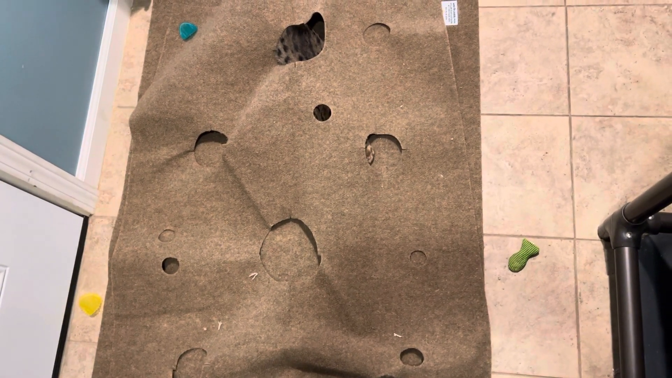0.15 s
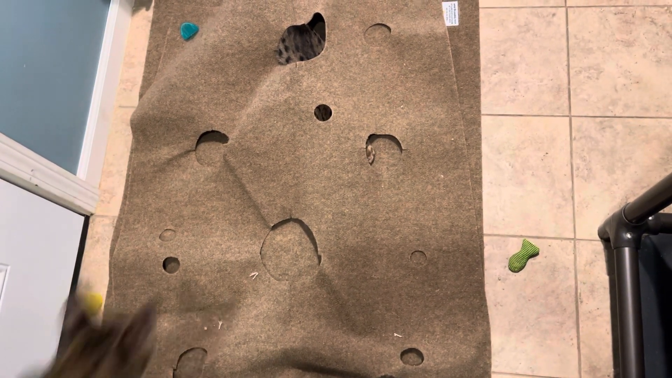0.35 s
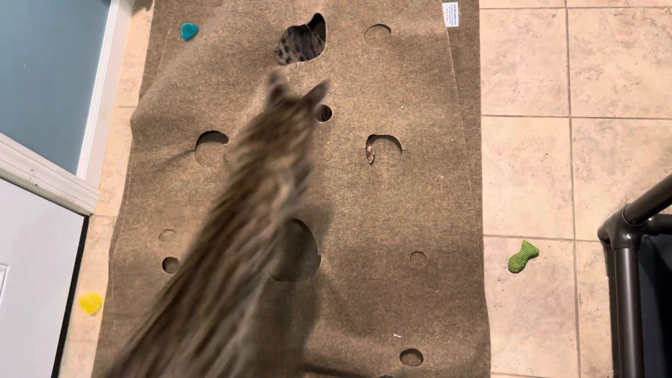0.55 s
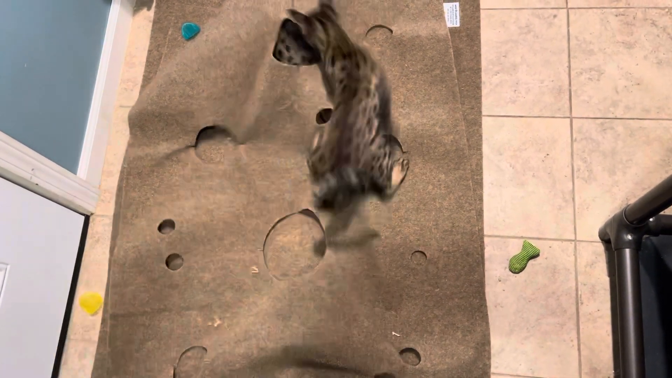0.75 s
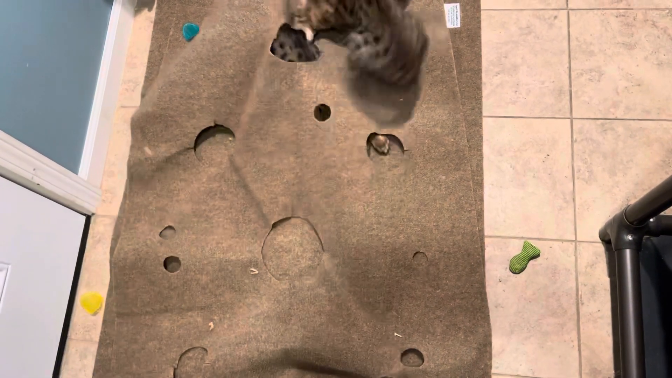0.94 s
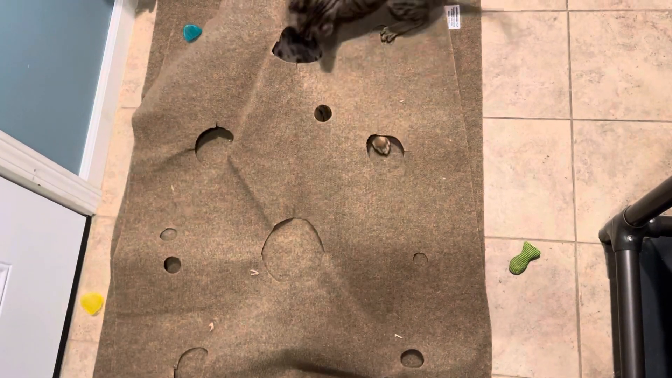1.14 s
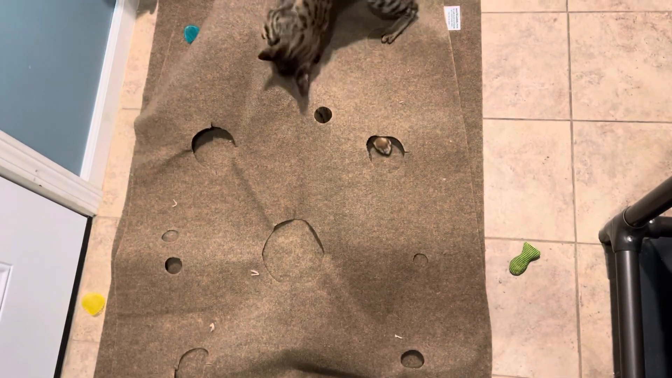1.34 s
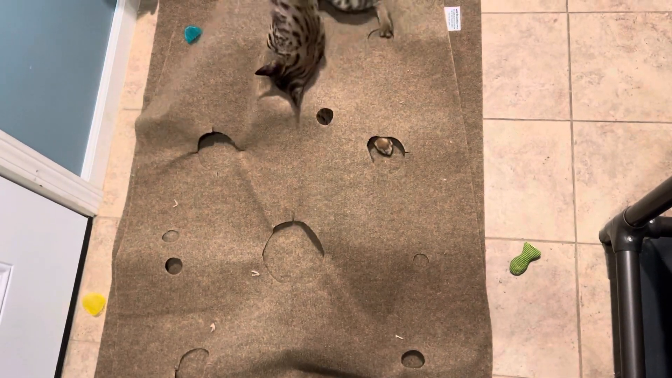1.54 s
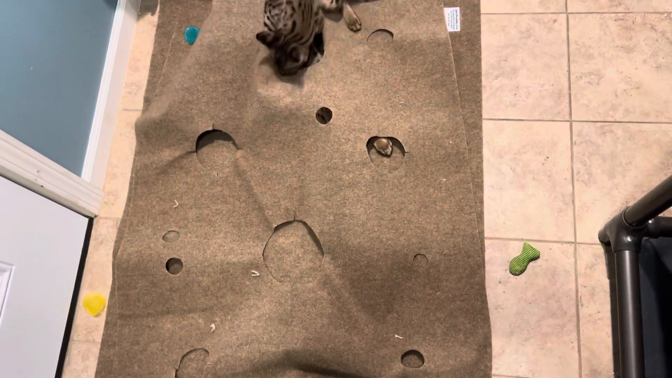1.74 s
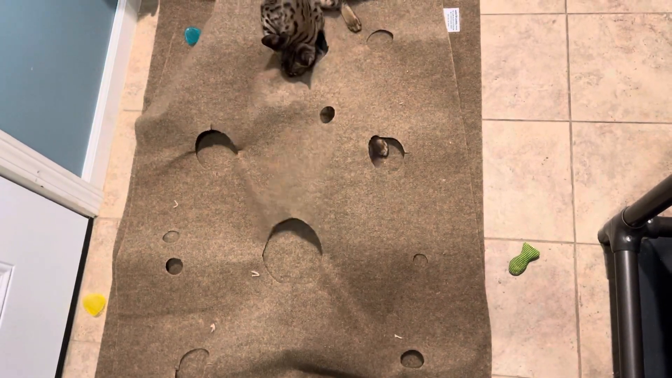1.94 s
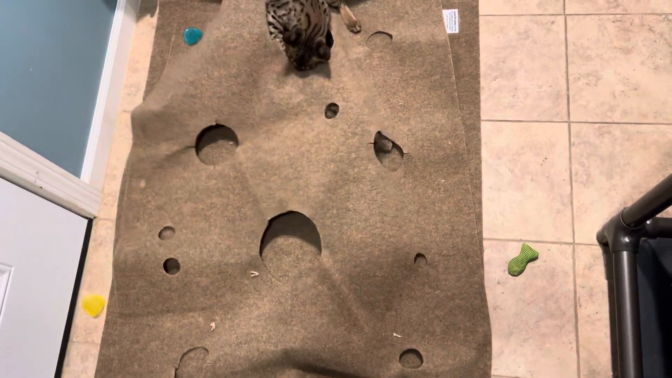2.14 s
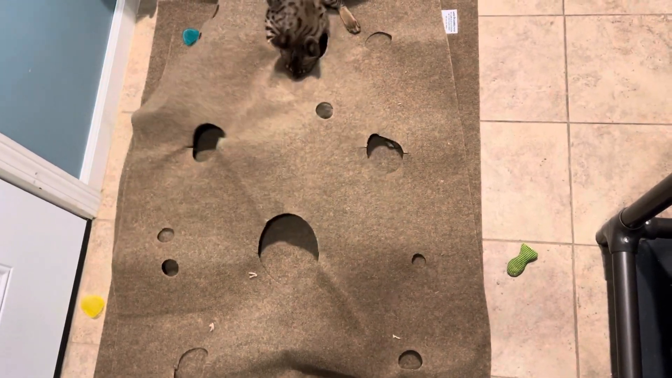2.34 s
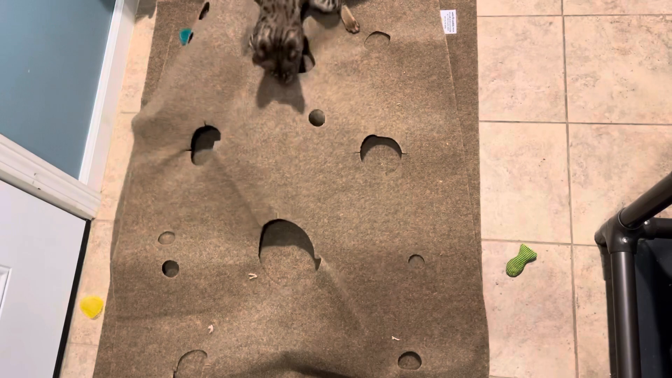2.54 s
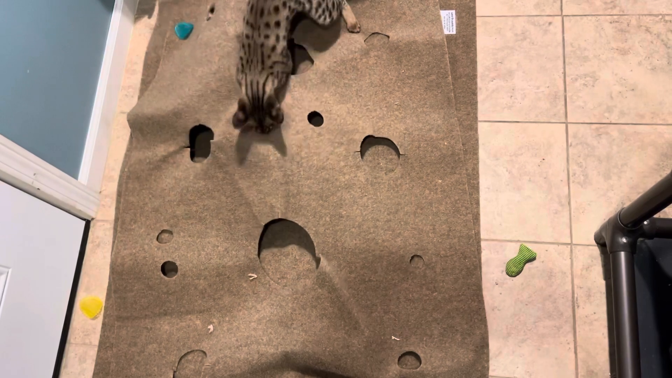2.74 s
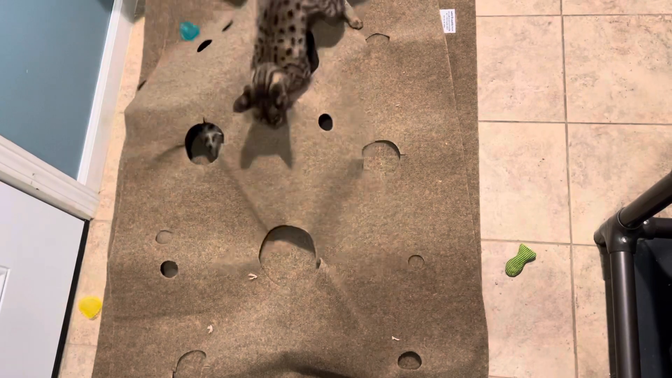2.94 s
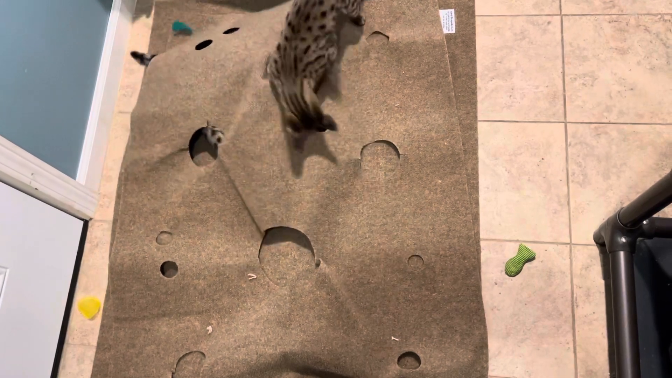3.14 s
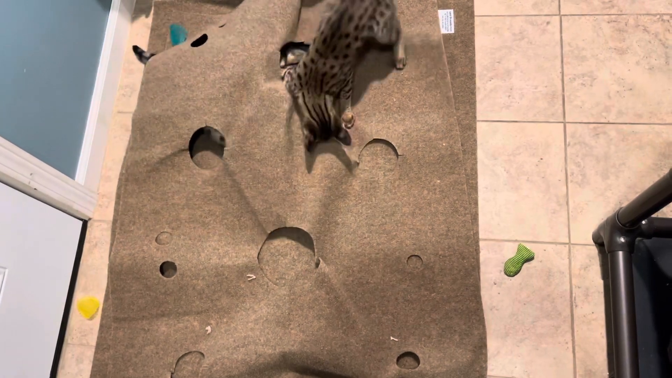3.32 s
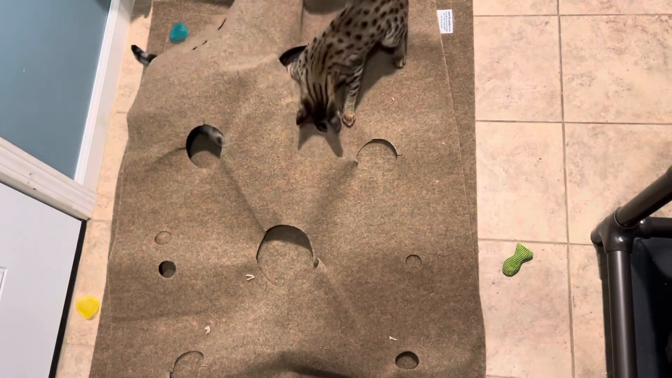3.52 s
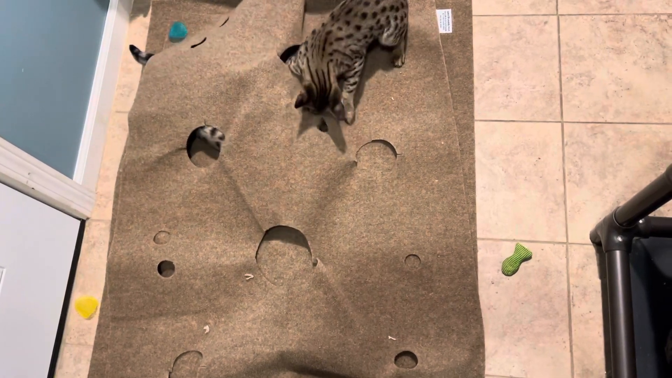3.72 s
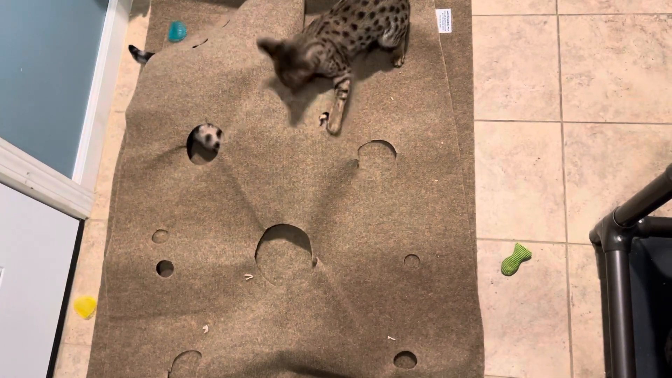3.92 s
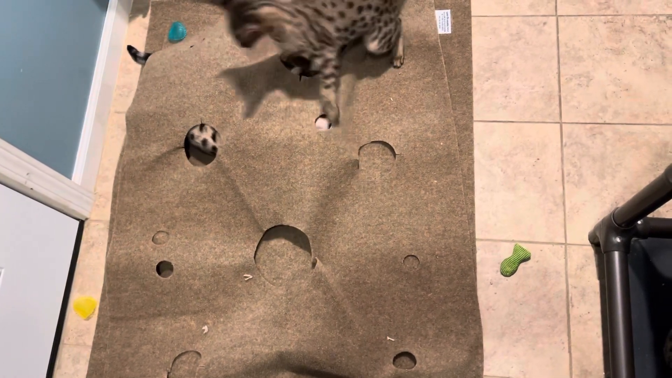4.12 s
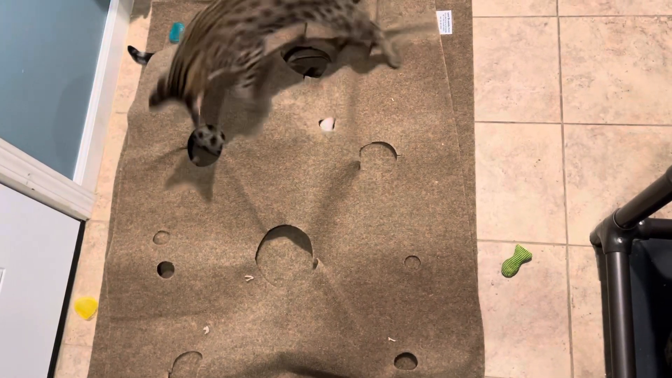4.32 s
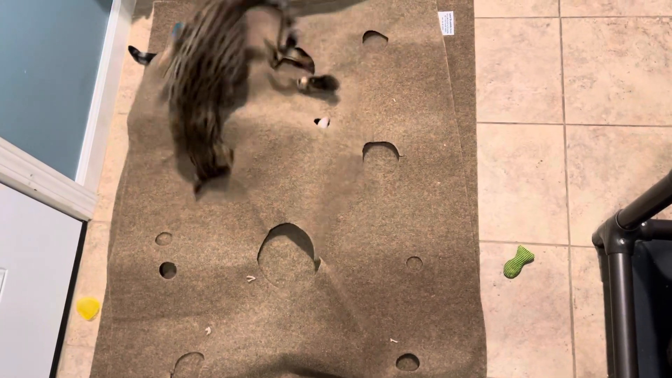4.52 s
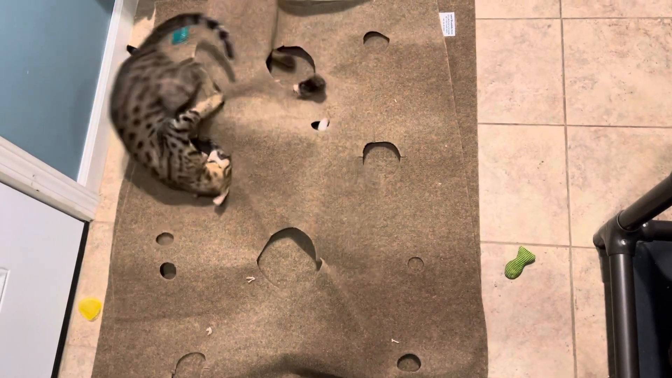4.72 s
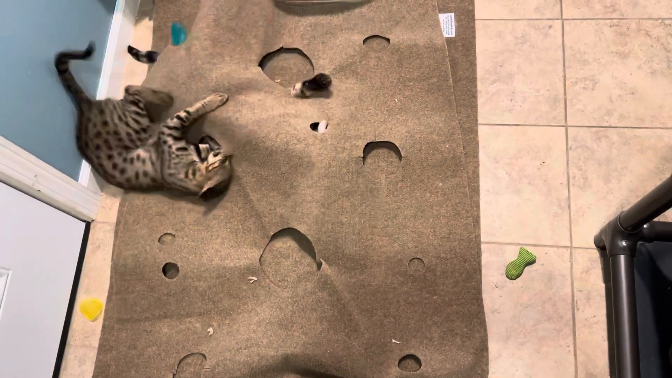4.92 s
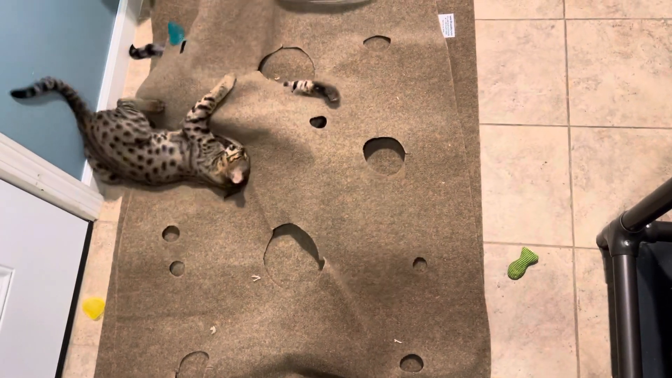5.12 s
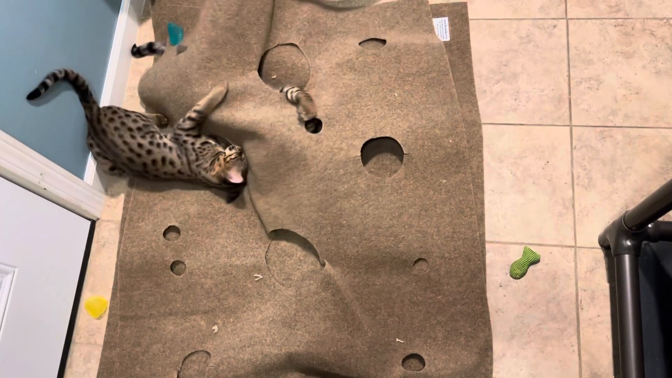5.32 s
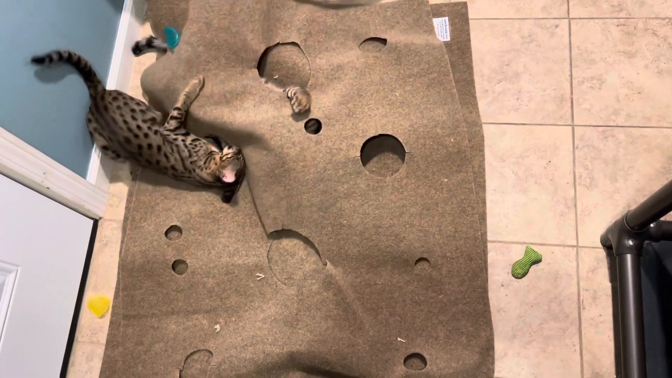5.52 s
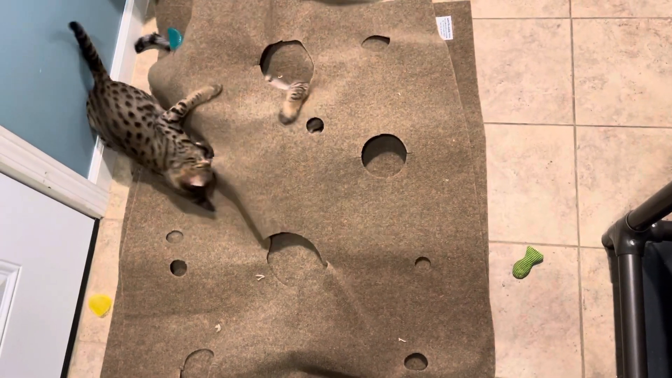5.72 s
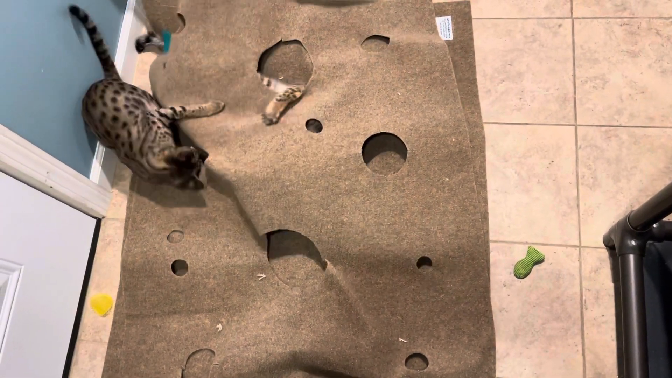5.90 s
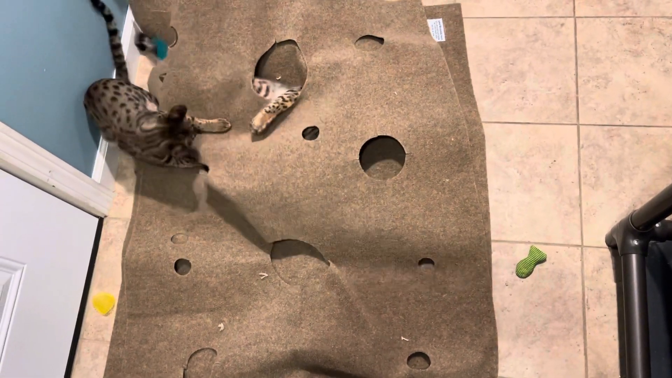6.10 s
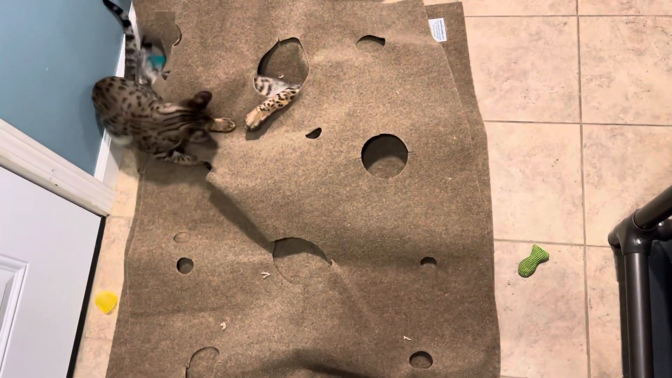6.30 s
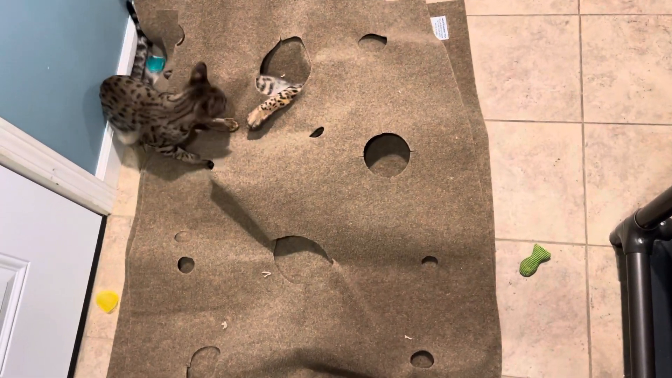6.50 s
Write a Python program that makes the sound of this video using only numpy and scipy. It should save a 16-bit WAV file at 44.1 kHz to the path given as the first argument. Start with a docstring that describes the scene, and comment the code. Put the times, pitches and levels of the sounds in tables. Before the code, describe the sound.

Close stereo sound in a small tiled room with a faint, steady low rumble. The first half second is nearly quiet, with a slight rasp starting. At about 0.66-0.9 s a kitten pounces: dense, hard slaps of rug against tile, thumps and skidding scuffs, with short reverberation; more slaps and shoves follow around 1.0 s. From 1.2 to 2.2 s it is much quieter, with light rustle and small claw ticks. From 2.25 to 2.9 s digging grows, with dull scuffs, pops, rasps and a low flap of air. A very loud, bright tearing crack hits at 3.0 s. Sparse plucks and hollow fold pops continue to 4.4 s. A rasping, hissy shove and thud come at 4.5 s, then the heaviest body thumps at 4.86-5.04 s. Rustling eases; a last scuff, thump and claw snaps at 5.9 s fade into quiet by 6.6 s.

```python
"""Kittens on a felt play rug

Small tiled room, close pair of microphones above a stiff felt rug on which kittens pounce, dig and roll.
Grains of noise make the rustle and scuffs, uneven ticks the rasps, clicks with a noisy crush the slaps,
plucks, pops and tears. Cushioned noise bursts make bodies thump on the floor, and a wavering low tone
makes the rug flap air. Dense decaying echoes answer from the walls, over a steady low rumble of noise."""
import sys
import numpy as np
from scipy import signal
from scipy.fft import rfft, irfft, next_fast_len
from scipy.io import wavfile
from scipy.ndimage import uniform_filter1d

SR = 44100
rng = np.random.default_rng(int(sys.argv[2]) if len(sys.argv) > 2 else 0)


def generate_wav(signal):
    """Clip the signal to [-1, 1] and save it as 16-bit WAV at the path in sys.argv[1]."""
    frames = np.transpose(np.atleast_2d(signal))
    scaled = np.clip(frames, -1, 1) * 32767
    pcm = np.round(scaled).astype(np.int16)
    wavfile.write(sys.argv[1], SR, pcm)


N = 293529
TIME = np.arange(N) / SR
BLOW_TIME = TIME[:SR // 4]


def from_db(db):
    """Decibels to gain."""
    return 10 ** (np.asarray(db) / 20)


def rms_one(x):
    """Scale to rms 1."""
    return x / np.sqrt(np.mean(x ** 2) + 1e-20)


def energy_one(x):
    """Scale to unit energy."""
    return x / np.sqrt(np.sum(x ** 2) + 1e-20)


def in_time(rows):
    """One sample-rate curve for each column of a table after its time column."""
    s, *columns = np.transpose(rows)
    return [np.interp(TIME, s, column) for column in columns]


def at_hz(points, hz):
    """Read a table on a log-frequency axis."""
    known_hz, values = np.transpose(points)
    return np.interp(np.log(hz + 1e-9), np.log(known_hz), values)


def add(track, s, sound):
    """Mix a sound into a track from time s."""
    start = max(round(s * SR), 0)
    track[start:start + len(sound)] += sound[:N - start]


def drift(rate):
    """Smooth chance with spread 1, turning about rate times a second."""
    knots = rng.standard_normal(N // 40)
    return rms_one(np.interp(TIME * rate, np.arange(len(knots)), knots))


def octave_band(x, centre_hz, octaves):
    """Keep a band of the given width around a centre frequency."""
    edges_hz = centre_hz * 2 ** (np.array([-.5, .5]) * octaves)
    return signal.sosfilt(signal.butter(2, edges_hz, "band", fs=SR, output="sos"), x)


def coloured(x, colour, size=8192):
    """Causal (minimum-phase) filter of unit energy with the given spectrum."""
    cepstrum = irfft(np.log(from_db(at_hz(colour, np.fft.rfftfreq(size, 1 / SR)))))
    # fold the cepstrum onto positive times, so nothing sounds before its cause
    cepstrum[1:size // 2] *= 2
    cepstrum[size // 2 + 1:] = 0
    response = energy_one(irfft(np.exp(rfft(cepstrum))))
    return signal.fftconvolve(x, response)[:len(x)]


def evened(x, width_hz):
    """Level out chance peaks and dips of the spectrum, leaving the course in time; unit energy."""
    hz = np.fft.rfftfreq(len(x), 1 / SR)
    power = uniform_filter1d(np.abs(rfft(x)) ** 2, max(round(width_hz / hz[1]), 1))
    inverse_db = -10 * np.log10(power + 1e-12)
    return energy_one(coloured(x, np.column_stack([hz, inverse_db])[1:]))


def contact(die_s, crush):
    """A short click with a noisy crush that dies over a few milliseconds; unit energy."""
    tail = energy_one(rng.standard_normal(len(BLOW_TIME)) * np.exp(-BLOW_TIME / max(die_s, 1e-4)))
    click = signal.unit_impulse(len(BLOW_TIME))
    # bending waves in the backing run at unequal speeds, which spreads the click without colouring it
    for hz in rng.uniform([700, 1500, 3500, 7000], [1500, 3500, 7000, 11000]):
        poles = signal.iirpeak(hz, 2, fs=SR)[1]
        click = signal.lfilter(poles[::-1], poles, click)
    return evened(click + crush * tail, width_hz=190)


def grains(per_s, spread_db):
    """Tiny slips of fibres at random moments, of very uneven size; rms 1."""
    sizes = from_db(spread_db * np.minimum(rng.exponential(1, N), 4)) * rng.choice([-1, 1], N)
    return rms_one(sizes * (rng.random(N) < per_s / SR))


# likeness of room sound at the left and right microphones: (frequency [Hz], likeness [0-1])
LIKENESS = [(100, 1), (300, 0.94), (900, 0.06), (1800, 0.88), (3200, 0.092), (4300, 0.035), (4900, 0.33),
            (5500, 0.17), (5900, 0.41), (7400, 1), (9100, 1), (11500, 0.9)]


def spread(one, other):
    """Two unrelated sounds become a pair with the left-right likeness given for each frequency."""
    size = next_fast_len(len(one))
    alike = np.clip(at_hz(LIKENESS, np.fft.rfftfreq(size, 1 / SR)), 0, 1)
    mid = rfft(one, size) * np.sqrt((1 + alike) / 2)
    side = rfft(other, size) * np.sqrt((1 - alike) / 2)
    return irfft(np.array([mid + side, mid - side]), size)[:, :len(one)]


# steady level of the room rumble [dB]
RUMBLE_DB = -45.5
# colour of the room rumble: (frequency [Hz], relative level [dB per Hz])
RUMBLE_COLOUR = [(12, -59.5), (20, -24.5), (46, -6.5), (70, 4.5), (107, -14), (136, -11), (157, -10.5),
                 (175, -17.5), (233, -13.5), (275, -19.5), (409, -29), (498, -37), (1500, -70.5),
                 (1950, -102), (3300, -120)]


def rumble():
    """The steady low rumble of the room: noise shaped towards the bass, spread over both microphones."""
    one, other = [coloured(rng.standard_normal(N), RUMBLE_COLOUR) for _ in range(2)]
    return from_db(RUMBLE_DB) * spread(one, other)


# restless shifting of the rug; the first rows give only a faint steady hiss: # (time [s], rubbing of the
# backing [dB], hiss of the fibres [dB])
RUSTLE = [(0, -80.5, -84), (0.6, -96.5, -90.5), (0.69, -50, -56), (1.1, -56.5, -55.5), (1.27, -70, -66),
          (1.45, -70, -86), (1.56, -71, -65), (1.68, -60.5, -64.5), (1.88, -65.5, -80), (2.0, -61.5, -60),
          (2.22, -54, -57.5), (2.48, -59, -56), (2.7, -52, -55.5), (3.05, -58.5, -55.5),
          (3.42, -61.5, -71.5), (3.7, -71, -63.5), (4.0, -64, -67), (4.26, -68.5, -69),
          (4.42, -57.5, -52.5), (4.78, -63, -61), (4.95, -49.5, -52), (5.2, -60.5, -62.5), (5.6, -62, -62),
          (6.0, -57, -58), (6.24, -71, -76), (6.4, -65, -79), (6.5, -85.5, -90.5), (6.6, -86, -85.5)]
# shoves sliding the rug over the tiles: (middle [s], length [s], rubbing [dB], hiss of the fibres [dB])
SHOVES = [(0.716, 0.053, -43, -51.5), (1.002, 0.055, -42.5, -50), (1.039, 0.061, -44, -43),
          (1.389, 0.13, -59, -60), (3.26, 0.069, -54.5, -66.5), (3.542, 0.069, -82, -57.5),
          (4.078, 0.049, -64, -59.5), (4.563, 0.064, -49, -38.5), (4.872, 0.059, -67, -49.5),
          (5.261, 0.066, -61, -60.5), (5.922, 0.12, -50.5, -53), (6.611, 0.026, -83, -74.5)]


def rub_and_hiss():
    """Gains of backing and fibres: restless shifting, plus a bell-shaped swell for each shove."""
    power = from_db(in_time(RUSTLE)) ** 2
    for s, length_s, rub_db, fibre_db in SHOVES:
        swell = np.exp(-np.pi * ((TIME - s) / length_s) ** 2)
        power = power + np.outer(from_db([rub_db, fibre_db]) ** 2, swell)
    return np.sqrt(power)


# colour of the rubbing backing: (frequency [Hz], relative level [dB per Hz])
RUB_COLOUR = [(120, -4), (300, 6), (600, 7), (1100, 2), (2200, -5.5), (3200, -14), (5000, -9.5),
              (9000, -43.5)]
# colour of the hissing fibres: (frequency [Hz], relative level [dB per Hz])
FIBRE_COLOUR = [(1000, -11), (2400, 6), (4200, 1), (6000, 1), (7200, 0.5), (9700, 4), (10800, 1.5),
                (11800, -20.5), (13000, -38.5)]


def rustle(snags_per_s, snag_db, lumpy_db, catching_db):
    """The backing rubs in lumps while the fibres crackle finely on top, and now and then one snags."""
    rubbing, hissing = rub_and_hiss()
    catching = drift(45)
    rub = coloured(grains(per_s=1500, spread_db=2.0), RUB_COLOUR) * from_db(lumpy_db * catching)
    crackle = grains(per_s=3800, spread_db=3.0) * from_db(catching_db * catching)
    snags = from_db(snag_db) * grains(per_s=snags_per_s, spread_db=3.0)
    return rub * rubbing + coloured(crackle + snags, FIBRE_COLOUR) * hissing


# claws and rug backing dragging in short or slow rasps: (start [s], length [s], level [dB],
# first ticks [per s], last ticks [per s], unevenness of their spacing [0-1], width of the rasp [Hz])
RASPS = [(0.466, 0.037, -75.5, 1528, 1587, 0.41, 600), (0.57, 0.078, -68, 2076, 2810, 0.85, 1480),
         (1.345, 0.06, -57.5, 2293, 2125, 0.37, 457), (1.65, 0.28, -63.5, 2490, 2520, 0.57, 600),
         (2.726, 0.034, -51, 2360, 2720, 0.75, 905), (2.764, 0.055, -51, 1864, 1750, 0.6, 700),
         (4.046, 0.02, -49, 2790, 2520, 0.63, 795), (4.063, 0.04, -49.5, 2410, 2216, 0.81, 790),
         (4.475, 0.016, -50, 2390, 2760, 0.6, 900), (4.539, 0.047, -42.5, 2350, 2495, 0.74, 960),
         (5.437, 0.04, -49.5, 2427, 2543, 0.6, 820), (5.474, 0.032, -59, 2530, 2390, 0.65, 1000)]


def rasps(bite_share, fade_share, tick_spread_db):
    """Claws or backing drag in unevenly spaced ticks, whose rate sets a rough, broad pitch that glides."""
    out, t = np.zeros(N), TIME[:SR // 2]
    for s, length_s, db, first_hz, last_hz, uneven, width_hz in RASPS:
        along = np.minimum(t / length_s, 1)
        travel = np.cumsum(first_hz + (last_hz - first_hz) * along) / SR
        catches = np.cumsum(np.maximum(1 + uneven * rng.standard_normal(SR // 20), .1))
        ticks = np.diff(np.searchsorted(catches, travel), prepend=0)
        ticks = ticks * from_db(tick_spread_db * rng.standard_normal(len(t)))
        pressure = np.sqrt(np.clip(np.minimum(along / bite_share, (1 - along) / fade_share), 0, 1))
        # each tick rings briefly at the pitch of the moment; the shorter the ring, the wider the rasp
        turning = np.exp(2j * np.pi * travel)
        ring = t * np.exp(-np.pi * width_hz * t)
        ringing = signal.fftconvolve((ticks - ticks.mean()) * pressure / turning, ring)[:len(t)]
        rasp = energy_one((ringing * turning).real)
        add(out, s, from_db(db) * rasp * np.linalg.norm(pressure))
    return out


# paws bumping the rug and skidding: (time [s], level [dB], die-away [s], centre [Hz])
SCUFFS = [(0.662, -39, 0.023, 1480), (0.681, -39, 0.014, 520), (0.736, -33, 0.013, 560),
          (0.746, -37, 0.035, 2300), (0.771, -35.5, 0.008, 700), (0.865, -38, 0.025, 740),
          (0.870, -33.5, 0.027, 2780), (0.893, -44, 0.02, 1400), (1.008, -36, 0.026, 2200),
          (1.041, -38.5, 0.018, 2880), (1.402, -50, 0.0065, 1600), (1.431, -48, 0.0057, 1300),
          (1.591, -52, 0.011, 965), (1.614, -60, 0.0063, 1600), (1.987, -56, 0.028, 1390),
          (2.122, -51.5, 0.031, 1205), (2.258, -37.5, 0.02, 686), (2.388, -44.5, 0.034, 790),
          (2.516, -56, 0.021, 2180), (2.637, -41, 0.017, 530), (2.716, -51, 0.008, 448),
          (2.763, -51, 0.019, 1470), (2.811, -48, 0.049, 544), (2.945, -53, 0.012, 2700),
          (2.977, -44, 0.024, 710), (3.22, -56, 0.02, 1000), (3.261, -47, 0.016, 1300),
          (3.325, -53, 0.014, 1500), (3.728, -48.5, 0.016, 1320), (3.785, -48.5, 0.016, 1340),
          (4.06, -49, 0.035, 400), (4.478, -51, 0.018, 1890), (4.693, -43, 0.013, 2760),
          (4.835, -42.5, 0.024, 3020), (4.859, -36, 0.0063, 2200), (4.896, -40, 0.01, 2370),
          (4.933, -56, 0.02, 2480), (4.95, -50, 0.032, 647), (4.984, -48, 0.014, 2500),
          (5.099, -38, 0.0089, 1900), (5.316, -49, 0.0058, 1300), (5.964, -38.5, 0.018, 440)]


def scuffs(rise_s, octaves, slips_per_s):
    """A paw bumps the rug and skids in a dying run of slips: dull with the pad, bright with the claws."""
    out = np.zeros(N)
    for s, db, die_s, hz in SCUFFS:
        force = (1 - np.exp(-BLOW_TIME / rise_s)) * np.exp(-BLOW_TIME / die_s)
        slips = evened(force * grains(slips_per_s, spread_db=0.5)[:len(force)], width_hz=240)
        scuff = energy_one(octave_band(slips, hz, min(octaves, 3)))
        add(out, s, from_db(db) * scuff * np.linalg.norm(force))
    return out


# paws slapping the rug onto the tiles, and at 5.1 s a claw plucking with a knock: (time [s], strength [dB], #
# pitch of the trapped air [Hz], bare smack against that air [dB])
SLAPS = [(0.6624, -10.5, 1590, -2), (0.7232, -3, 680, -17.5), (0.7294, 3, 1810, 0), (0.7358, -7, 3160, 1),
         (0.742, -11, 1550, -7), (0.7505, -7.5, 630, -8.5), (0.8640, -4.5, 1430, -1.5),
         (0.983, -5, 1530, -3.5), (1.615, -28, 1860, -4), (5.0995, -20, 1610, -2)]
# colour of the bare smack: (frequency [Hz], relative level [dB per Hz])
SLAP_COLOUR = [(90, -4.5), (160, -5), (300, -7), (750, -1.5), (1100, -2.5), (1800, -2.5), (2700, -4.5),
               (4000, -3.5), (6000, -18), (10000, -12), (11500, -22.5), (13000, -55)]
# what a slap sets ringing in the arched rug: (frequency [Hz], relative level [dB], t60 [s])
RUG_MODES = [(517, -17, 0.12), (732, -8.5, 0.12), (1715, -18.5, 0.15), (1920, -21.5, 0.088)]


def slaps(die_s, pocket_q, ring_db):
    """Paws drive the rug flat on the tiles; trapped air pitches each slap, and the arched rug rings on."""
    out = np.zeros(N)
    for s, db, hz, smack_db in SLAPS:
        smack = coloured(contact(die_s, crush=1.17), SLAP_COLOUR)
        pocket = energy_one(octave_band(smack, hz, 1 / pocket_q))
        add(out, s, from_db(db) * energy_one(pocket + from_db(smack_db) * smack))
    ring = 0
    for hz, db, t60 in RUG_MODES:
        mode = np.sin(2 * np.pi * hz * BLOW_TIME) * np.exp(-np.log(1000) * BLOW_TIME / t60)
        ring = ring + from_db(db) * energy_one(mode)
    return out + from_db(ring_db) * signal.fftconvolve(out, ring)[:N]


# bodies and haunches landing: (time [s], level [dB], die-away [s], top frequency [Hz])
THUMPS = [(0.668, -32, 0.032, 670), (0.730, -29.5, 0.035, 534), (3.009, -39, 0.037, 780),
          (4.518, -30, 0.012, 307), (4.615, -41.5, 0.045, 605), (4.857, -26, 0.026, 580),
          (4.870, -24.5, 0.017, 320), (5.016, -34.5, 0.028, 540), (5.038, -30, 0.026, 262),
          (5.340, -42.5, 0.029, 393), (5.949, -39, 0.016, 610)]
# every landing builds up alike and shakes the floor with a share of its force
THUMP_RISE_S, FLOOR_HZ, FLOOR_DIE_S, FLOOR_DB = 0.0021, 91.5, 0.031, -4


def thumps(cavity_hz, cavity_q, cavity_db):
    """A soft body lands in a cushioned burst; the air under the rug booms and the floor shudders."""
    out = np.zeros(N)
    shudder = np.sin(2 * np.pi * FLOOR_HZ * BLOW_TIME) * np.exp(-BLOW_TIME / FLOOR_DIE_S)
    low_cut = signal.butter(2, 120, "high", fs=SR, output="sos")
    for s, db, die_s, top_hz in THUMPS:
        rise = np.minimum(BLOW_TIME / THUMP_RISE_S, 1)
        force = rise * np.exp(-np.maximum(BLOW_TIME - THUMP_RISE_S, 0) / die_s)
        impacts = evened(force * rng.standard_normal(len(force)), width_hz=60)
        cushion = signal.butter(3, top_hz, fs=SR, output="sos")
        thud = signal.sosfilt(np.vstack([cushion, low_cut]), impacts)
        boom = signal.lfilter(*signal.iirpeak(cavity_hz, cavity_q, fs=SR), thud)
        landing = energy_one(thud + from_db(cavity_db) * boom) * np.linalg.norm(force)
        add(out, s, from_db(db) * (landing + from_db(FLOOR_DB) * shudder))
    return out


# the whole rug heaves and pumps air: (middle [s], length [s], level [dB])
HEAVES = [(0.743, 0.06, -39), (2.8, 0.14, -41), (3.578, 0.088, -44.5), (4.43, 0.037, -45),
          (4.888, 0.042, -33), (5.105, 0.091, -39.5)]


def heaves(flap_hz, wander):
    """The lifted rug sinks back with a slow, wavering flap of air."""
    swell = 0
    for s, length_s, db in HEAVES:
        swell = swell + from_db(db) * np.exp(-np.pi / 2 * ((TIME - s) / length_s) ** 2)
    cycles = np.cumsum(flap_hz * (1 + wander * drift(40))) / SR
    return swell * rms_one(np.sin(2 * np.pi * cycles))


# sharpest plucks of a claw in the fibres: (time [s], strength [dB], dull knock against the bright snap [dB])
PLUCKS = [(1.1892, -28, 0), (1.347, -28, -8), (1.352, -21, -18), (1.616, -26, -11), (2.115, -22.5, -5),
          (2.517, -25, -1), (2.5655, -22.5, 0), (2.6673, -19.5, 2), (2.7268, -23.5, -6), (2.7506, -24, -11),
          (2.786, -25, -12.5), (2.889, -20, -2), (3.5032, -17, -8.5), (3.5517, -20, -13), (3.609, -18, -13),
          (3.914, -33, 10.5), (4.049, -37, -16), (4.4823, -19.5, 0), (4.8346, -23.5, 2),
          (4.9316, -13.5, -3.5), (4.942, -20, 3), (5.251, -32, -6), (5.317, -33, -5), (5.9681, -15, -8),
          (6.137, -36.5, -10)]
# colour of a bright snap, also the crack of a fold: (frequency [Hz], relative level [dB per Hz])
SNAP_COLOUR = [(1000, -22), (2500, 7.5), (4000, 4.5), (5700, 6.5), (7500, 5), (9800, 7.5), (11000, -3.5),
               (12300, -40.5), (14000, -39.5)]
# colour of the knocking backing: (frequency [Hz], relative level [dB per Hz])
KNOCK_COLOUR = [(100, 9), (500, -2), (1200, -6.5), (2300, 4.5), (3500, -10.5), (6000, -8.5), (13000, -35)]


def plucks():
    """A fibre lets go of a claw with a bright snap, and the backing knocks as it springs back."""
    snaps, knocks = np.zeros(N), np.zeros(N)
    for s, db, knock_db in PLUCKS:
        add(snaps, s, from_db(db) * contact(0.0051, crush=1.7))
        add(knocks, s, from_db(db + knock_db) * contact(0.01, crush=1.16))
    return coloured(snaps, SNAP_COLOUR) + coloured(knocks, KNOCK_COLOUR)


# folds of the rug popping over: (time [s], strength [dB], pitch [Hz], crack against the pop [dB])
POPS = [(2.258, -19, 985, -1.5), (2.389, -24.5, 1420, -2), (2.604, -21, 1090, -22), (2.637, -14.5, 810, -5),
        (2.765, -18, 1600, -20), (2.975, -24, 1060, -24), (3.219, -21, 920, -14), (3.261, -26.5, 920, -1.5),
        (3.414, -27.5, 1230, -21), (3.757, -22.5, 1240, 3.5), (3.872, -17.5, 1140, -11.5),
        (4.304, -20, 1020, 0.5), (4.37, -15, 1070, 1), (4.461, -14.5, 990, -20), (4.511, -22, 930, -18),
        (5.428, -25.5, 920, -0.5)]


def pops(ring_s):
    """A fold flips over with a crack, and the pocket beneath it rings briefly."""
    pockets, cracks = np.zeros(N), np.zeros(N)
    for s, db, hz, crack_db in POPS:
        ring = np.cos(2 * np.pi * hz * BLOW_TIME) * BLOW_TIME * np.exp(-BLOW_TIME / ring_s)
        pocket = energy_one(signal.fftconvolve(ring, contact(0.014, crush=0.93)))
        add(pockets, s, from_db(db) * pocket)
        add(cracks, s, from_db(db + crack_db) * contact(0.0091, crush=1.0))
    return pockets + coloured(cracks, SNAP_COLOUR)


# a hooked claw tearing loose: (time [s], strength [dB])
TEARS = [(3.0071, 4), (5.884, -30), (5.895, -19.5), (5.926, -34), (5.952, -11.5), (5.967, -18.5)]
# colour of the tearing: (frequency [Hz], relative level [dB per Hz])
TEAR_COLOUR = [(150, -8.5), (500, -4), (1300, -11), (3500, -9), (5700, 0), (7500, -1.5), (9800, 7),
               (11000, 1.5), (12300, -22), (15000, -23.5)]


def tears():
    """A deeply hooked claw breaks free with one very bright crack."""
    cracks = np.zeros(N)
    for s, db in TEARS:
        add(cracks, s, from_db(db) * contact(0.0035, crush=1.3))
    return coloured(cracks, TEAR_COLOUR)


# reverberation of the small tiled room: (frequency [Hz], t60 [s])
ROOM_T60 = [(100, 0.6), (500, 0.81), (2000, 0.39), (6000, 0.32), (12000, 0.045)]


def room_echo(build_s, count=10):
    """Response of the tiled room: dense echoes that build up, then die at a rate set band by band."""
    t, tail = TIME[:SR // 2], 0
    hz = np.fft.rfftfreq(len(t), 1 / SR)
    white = rfft(rng.standard_normal((2, len(t))))
    centres = np.geomspace(30, 15000, count)
    for centre, share in zip(centres, np.eye(count)):
        band = irfft(white * np.interp(hz, centres, share), len(t))
        tail = tail + band * 1000 ** (-t / at_hz(ROOM_T60, centre))
    build = 1 - np.exp(-t / build_s)
    return spread(*[evened(side * build, width_hz=100) for side in tail])


def room(sound, build_s, count=14):
    """The kittens keep moving, so each stretch of sound meets a different pattern of echoes."""
    out, step = np.zeros((2, N)), N // count
    fade = signal.get_window("hann", 2 * step) ** .5
    for start in range(0, N - step, step):
        stretch = sound[start:start + 2 * step] * fade[:N - start]
        echoes = signal.fftconvolve(stretch[None], room_echo(build_s), axes=1)
        for channel, echo in zip(out, echoes):
            add(channel, start / SR, echo)
    return out


def scene():
    """Contacts are heard directly and off the hard walls; the flaps of air and the rumble get no echo."""
    # (sound, share sent into the room [dB])
    sources = [
        (rustle(snags_per_s=90, snag_db=-10.5, lumpy_db=3.0, catching_db=2.0), -3.0),
        (rasps(bite_share=0.2, fade_share=0.32, tick_spread_db=4.5), -3.0),
        (scuffs(rise_s=0.0034, octaves=1.22, slips_per_s=900), -4.5),
        (slaps(die_s=0.002, pocket_q=0.87, ring_db=-12), -2.0),
        (thumps(cavity_hz=186, cavity_q=2.0, cavity_db=-3.5), -8.0),
        (plucks(), -2.0),
        (pops(ring_s=0.00062), -4.5),
        (tears(), -1.0)]
    direct = sum(sound for sound, room_db in sources)
    sent = sum(sound * from_db(room_db) for sound, room_db in sources)
    return direct + room(sent, build_s=0.00086) + heaves(flap_hz=78.5, wander=0.1193) + rumble()


# phase between the two microphone ports: (frequency [Hz], lead of left over right [rad])
PORT_PHASE = [(0, 0), (70, .04), (400, -.1), (900, -.7), (1500, 0), (2200, .3), (3000, -.5), (4200, -.5),
              (4500, -2.8), (5100, -2.9), (5550, -.1), (6100, .1), (8900, 3.1), (11200, 4.8), (12000, 6.2)]
CUTOFF_HZ = 13700


def record(dry):
    """The two microphone ports differ in phase; the top is cut."""
    size = next_fast_len(N + SR // 10)
    lead = np.interp(np.fft.rfftfreq(size, 1 / SR), *np.transpose(PORT_PHASE))
    # half of the lead goes to each side
    pair = irfft(rfft(dry, size) * np.exp(.5j * np.array([lead, -lead])), size)[:, :N]
    return signal.sosfilt(signal.ellip(8, .3, 70, CUTOFF_HZ, fs=SR, output="sos"), pair)


dry = scene()
out = record(dry)
generate_wav(out)
```